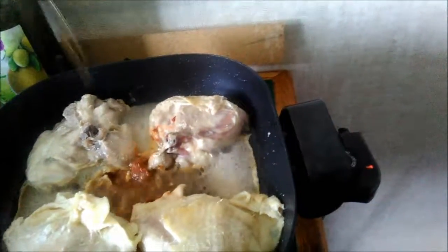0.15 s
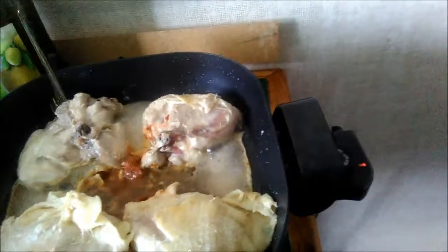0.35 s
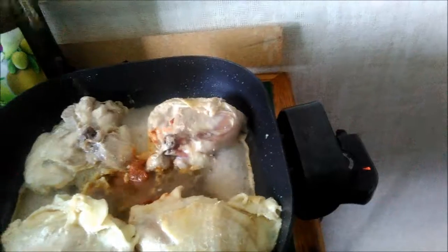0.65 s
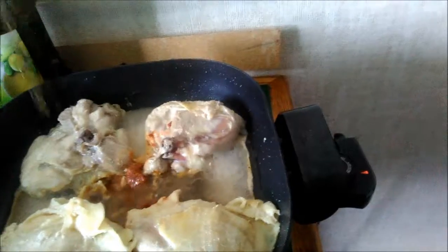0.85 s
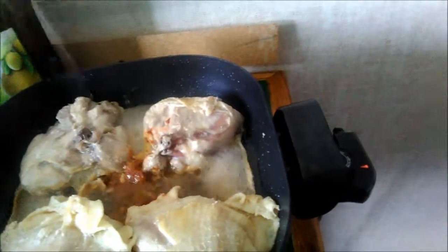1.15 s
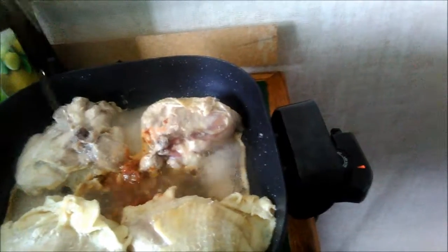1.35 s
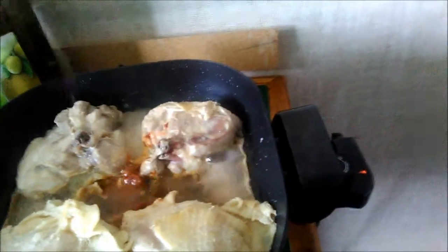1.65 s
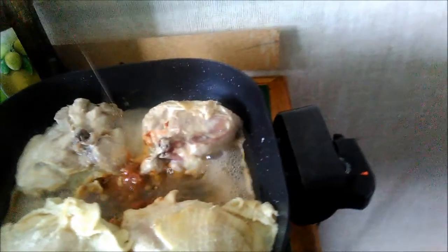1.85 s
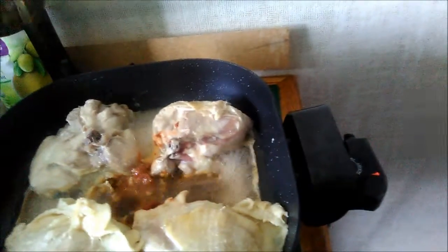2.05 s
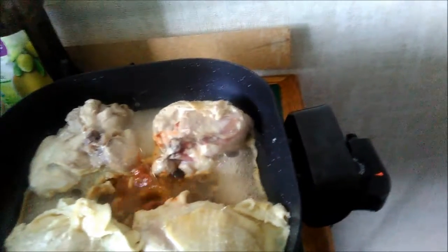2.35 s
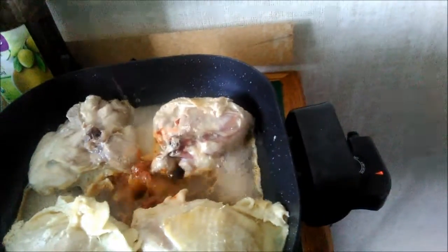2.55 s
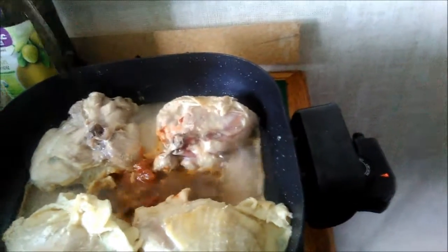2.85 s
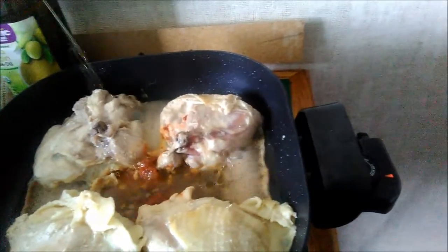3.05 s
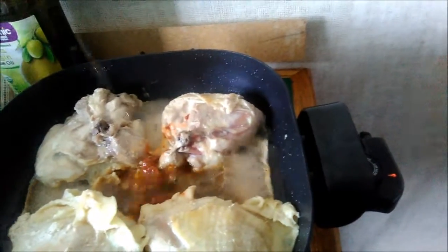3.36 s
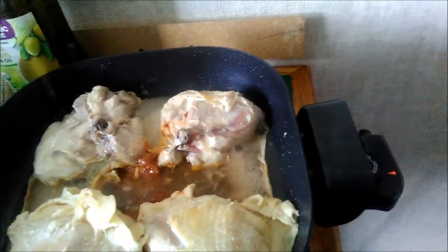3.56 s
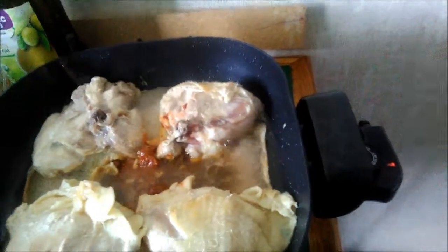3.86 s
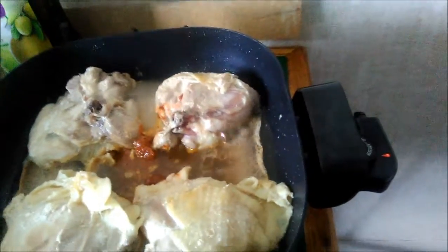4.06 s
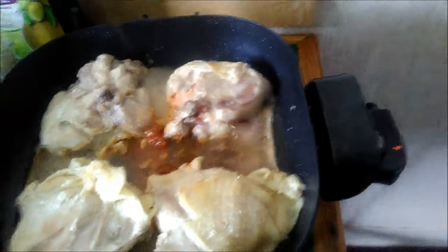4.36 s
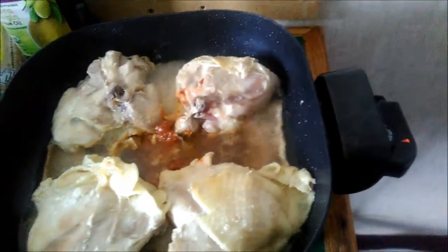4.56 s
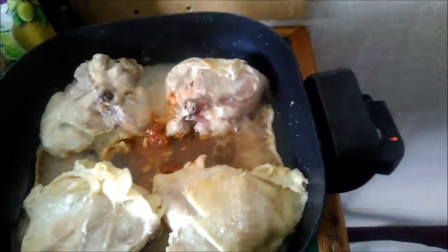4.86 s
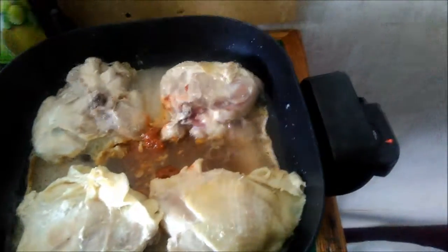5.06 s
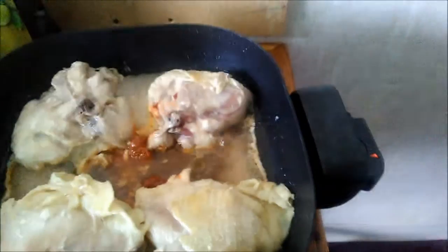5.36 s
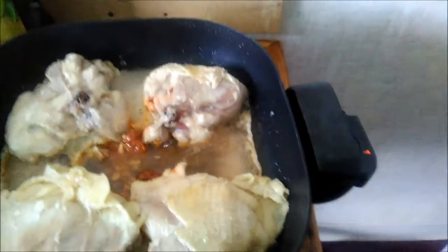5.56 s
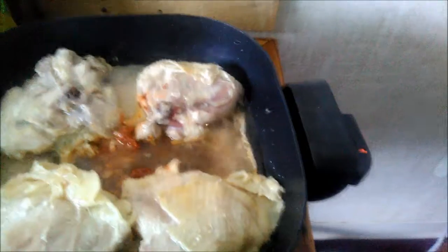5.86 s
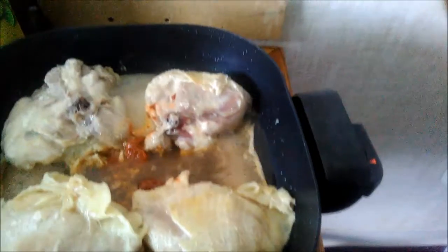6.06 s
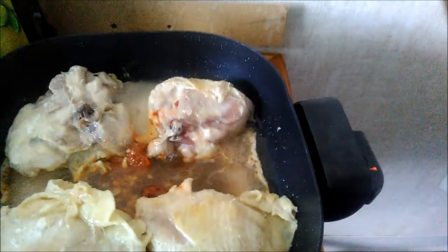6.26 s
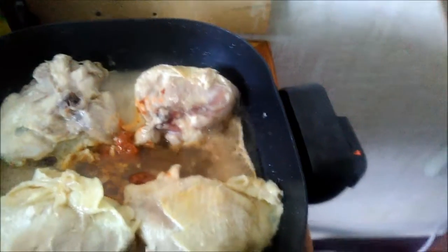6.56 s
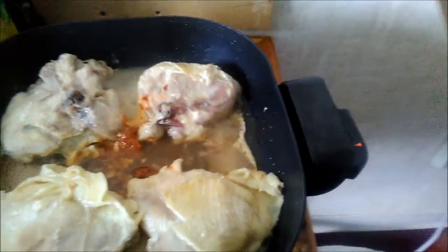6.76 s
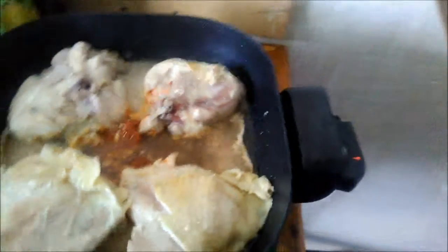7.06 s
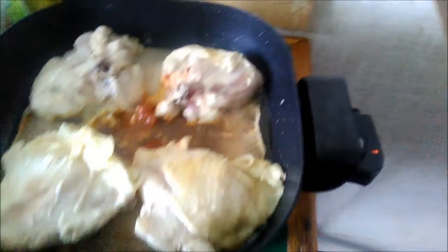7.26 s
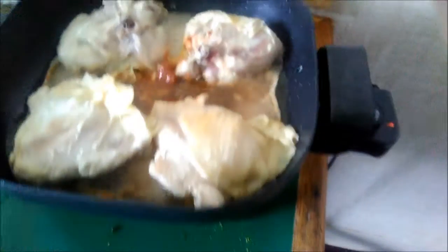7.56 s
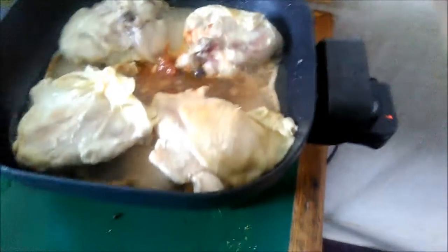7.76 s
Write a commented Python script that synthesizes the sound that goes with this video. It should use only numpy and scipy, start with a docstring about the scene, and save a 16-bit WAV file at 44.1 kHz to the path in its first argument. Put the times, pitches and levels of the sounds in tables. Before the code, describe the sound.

Close stereo pickup in a small kitchen: a thin stream of sauce sprays and sloshes into a pan of chicken in quick irregular spurts, with crisp ticking drops and small bubbly plops. The flow thins, brief squeaks appear, then a bottle lands hard on a wooden counter. A second later its cap snaps shut, followed by dull nudges and faint scraping rushes. Low rumble, a midrange drone and soft hiss continue behind.

```python
"""A thin stream of sauce trickles from a bottle into a pan, heard close by with two unlike microphones.
Shaped noise makes its spray and slosh; spurts swell, drops tick as short pings and trap small ringing bubbles.
The bottle is set down hard on a wooden counter, ringing wood and base, its cap is snapped shut (a noise crack
and a ring) and it is nudged again; late rushes scrape. Steady sines make squeaks, then a faint 800 Hz ring
around and after the nudge. The kitchen hums and hisses behind as noise."""
import sys
import numpy as np
from scipy import signal
from scipy.fft import rfft, irfft, next_fast_len
from scipy.io import wavfile
from scipy.ndimage import uniform_filter1d, map_coordinates

SR = 44100
rng = np.random.default_rng(int(sys.argv[2]) if len(sys.argv) > 2 else 0)


def pcm_store(signal):
    """Save signal as 16-bit PCM."""
    levels = np.round(np.clip(np.atleast_2d(signal), -1, 1) * 32767)
    wavfile.write(sys.argv[1], SR, levels.astype(np.int16).T)


N = 348390  # length in samples


def amp(db):
    """Turns dB into gain."""
    return 10 ** (np.asarray(db) / 20)


def unit(x):
    """Scales x to rms 1."""
    return x / np.sqrt(np.mean(x ** 2) + 1e-20)


def along(points, hz):
    """Reads a value at each frequency from (Hz, value) points joined on a log axis."""
    point_hz, values = np.transpose(points)
    return np.interp(np.log(hz + 1), np.log(point_hz + 1), values)


def curves(rows):
    """Gives one value per sample for each column after the time."""
    s, *columns = np.transpose(rows)
    return [np.interp(np.arange(N) / SR, s, column) for column in columns]


def wobble(rate):
    """A smooth random curve with rate knots a second."""
    knots = rng.standard_normal(int(N * rate / SR) + 4)
    return map_coordinates(knots, [np.arange(N) * rate / SR])


def filtered(x, response):
    """Shapes x with a response, possibly complex, for each frequency."""
    size = next_fast_len(x.shape[-1] + 8192)
    shaped = rfft(x, size) * response(np.fft.rfftfreq(size, 1 / SR))
    return irfft(shaped, size)[..., :x.shape[-1]]


def coloured(spectrum, count):
    """Noise of rms 1 with the given spectrum."""
    return unit(filtered(rng.standard_normal(count), lambda hz: amp(along(spectrum, hz))))


# How alike left and right are. Each row: frequency in Hz, likeness (1 the same, 0 unrelated).
LIKENESS = [(60, 0.86), (180, 0.85), (550, 0.85), (1650, 0.45), (4970, -0.14), (15000, 0.12)]


def spread(pair, response):
    """Two unrelated signals become left and right, alike in the bass and nearly unrelated in the treble."""
    def weights(hz):
        turn = np.arccos(np.clip(along(LIKENESS, hz), -1, 1)) / 2
        return response(hz) * [np.cos(turn), np.sin(turn)]

    mid, side = filtered(pair, weights)
    return np.array([mid + side, mid - side])


def rush(spectrum, patchy_db, lumps=0):
    """Stereo noise, its middle at rms 1, with short patches of random gain; lumps (dB per sample) add grain."""
    z = signal.stft(rng.standard_normal((2, N)), nperseg=512)[2]
    patches = uniform_filter1d(rng.standard_normal(z.shape[1:]), 14, 0)  # smooth over frequency
    patches = unit(uniform_filter1d(patches, 4, 1))  # and over time
    pair = amp(lumps) * signal.istft(z * amp(patchy_db * patches), nperseg=512)[1][:, :N]
    out = spread(pair, lambda hz: amp(along(spectrum, hz)))
    return out / np.std(out.mean(axis=0))


def ring(modes, attack):
    """A second of damped modes, each a sine that fades 60 dB in its own time; attack is in seconds."""
    t = np.arange(SR) / SR
    tones = sum(amp(db - 60 * t / t60) * np.sin(2 * np.pi * hz * t) for hz, db, t60 in modes)
    return tones * (1 - np.exp(-t / attack))


def add(track, s, sound):
    """Mixes a sound into the track from s seconds on."""
    part = track[round(s * SR):][:len(sound)]
    part += sound[:len(part)]


# The trickle beneath the spurts. Each row: time in seconds, spray level in dB, slosh level in dB.
TRICKLE = [(0.0, -67, -62), (3.41, -65.5, -64.5), (4.31, -69, -61), (5.6, -70.5, -61), (6.1, -67.5, -66),
           (7.9, -72, -65.5)]
# The clearest spurts, and late scraping rushes from 7.4 s. Each row: start in seconds, swell time in seconds,
# spray in dB, slosh in dB. The swell curve peaks about 4 dB under these levels.
SURGES = [(0.026, 0.02, -56, -81), (0.26, 0.042, -62.5, -55), (0.508, 0.032, -53.5, -62.5),
          (0.713, 0.01, -64.5, -52.5), (0.849, 0.0033, -55, -49.5), (1.029, 0.0091, -50, -57.5),
          (1.261, 0.014, -60.5, -48), (1.352, 0.0079, -59, -56), (1.657, 0.017, -50, -58.5),
          (1.788, 0.0078, -63.5, -49.5), (1.877, 0.02, -55, -50.5), (2.119, 0.016, -54, -61.5),
          (2.447, 0.013, -52, -57), (2.625, 0.022, -55, -61), (2.844, 0.018, -50.5, -51),
          (2.982, 0.0086, -51.5, -68), (3.066, 0.014, -54, -58), (3.307, 0.007, -50.5, -52),
          (3.404, 0.014, -50, -57), (3.857, 0.0057, -59, -57), (4.392, 0.028, -64, -52.5),
          (4.595, 0.043, -58, -66.5), (4.757, 0.0093, -56, -57), (4.926, 0.022, -58, -57.5),
          (5.55, 0.028, -56, -61.5), (6.168, 0.0087, -58, -55.5), (6.405, 0.02, -59, -79),
          (6.636, 0.013, -74, -51.5), (7.241, 0.014, -60.5, -62), (7.305, .012, -73, -58),
          (7.362, .004, -68.5, -57), (7.405, 0.0122, -71, -59), (7.445, .012, -67, -61.5),
          (7.56, 0.016, -59.5, -62)]
# Fainter spurts at random: how many, swell time in seconds, dB over the trickle before the swell curve, scatter in dB
SMALL_SPURTS, SMALL_SWELL_S, SMALL_DB, SMALL_SCATTER_DB = 30, 0.0033, 6.5, 3


def flow():
    """Levels of spray and slosh: the trickle plus surges that swell fast and drain slowly; powers add."""
    trickle = amp(curves(TRICKLE)) ** 2
    spray, slosh = trickle.copy()
    t = np.arange(SR // 2) / SR

    def surge(swell):
        return t / swell * np.exp(-t / swell)

    for s, swell, spray_db, slosh_db in SURGES:
        add(spray, s, amp(spray_db) ** 2 * surge(swell))
        add(slosh, s, amp(slosh_db) ** 2 * surge(swell))
    times = rng.random(SMALL_SPURTS) * N / SR
    sizes_db = SMALL_DB + SMALL_SCATTER_DB * rng.standard_normal((SMALL_SPURTS, 2))
    for s, (fine, coarse) in zip(times, amp(sizes_db) ** 2):
        add(spray, s, fine * trickle[0, int(s * SR)] * surge(SMALL_SWELL_S))
        add(slosh, s, coarse * trickle[1, int(s * SR)] * surge(SMALL_SWELL_S))
    return np.sqrt(spray), np.sqrt(slosh)


# Colour of the fine spray on the food. Each row: frequency in Hz, relative level in dB per Hz.
SPRAY = [(1500, -28.5), (2600, -7), (3400, -6), (4700, -0.5), (6300, -9), (8500, -8.5), (11000, -14.5),
         (14400, -18)]
# Colour of the slosh in the pool. Each row: frequency in Hz, relative level in dB per Hz.
SLOSH = [(470, -15), (800, -7), (1260, -5), (2380, -7), (2600, -5.5), (2960, -9.5), (3600, -24),
         (4680, -30.5), (7920, -120)]


def stream(spray, slosh):
    """The sauce sprays on the food and sloshes in the pool: two grainy noises that follow the flow."""
    fine = rush(SPRAY, patchy_db=2.0, lumps=2.96 * wobble(450) + 1.6 * wobble(40))
    coarse = rush(SLOSH, patchy_db=2.5, lumps=1.9 * wobble(120) + 1.4 * wobble(30))
    return spray * fine + slosh * coarse


# The background over time. Each row: time in seconds, rumble level in dB, drone level in dB.
KITCHEN = [(0.0, -52.5, -59), (1.89, -53.5, -62), (5.6, -51, -60), (6.3, -49.5, -60), (6.86, -55, -59),
           (7.4, -53.5, -63.5), (7.62, -54, -73), (7.9, -56, -68)]
# Colours of the three background noises. Each row: frequency in Hz, relative level in dB per Hz.
RUMBLE = [(12, -26.5), (22, -2.5), (40, -10.5), (58, -4.5), (75, 1.5), (88, -8), (100, -19.5), (120, -2.5),
          (145, -9), (175, -14.5), (222, -11), (280, -15.5), (400, -21.5), (500, -35.5), (800, -93)]
DRONE = [(210, -14.5), (350, -15), (413, -2.5), (568, -2.5), (774, 4), (918, -5.5), (1130, -12.5),
         (1200, -20.5), (1560, -36), (2640, -120)]
HISS = [(530, -62), (900, -3.5), (1120, -6.5), (1250, -3.5), (1780, 1), (2100, -26.5), (2300, -1),
        (3040, -30.5), (4360, -28.5), (5830, -5), (8450, -8.5), (12500, -14.5), (14400, -17.5)]


def kitchen():
    """A throbbing rumble, a drone near 750 Hz and a smooth hiss, each made of shaped noise."""
    rumble_db, drone_db = curves(KITCHEN)
    rumble = amp(rumble_db + 0.47 * wobble(5.156)) * rush(RUMBLE, patchy_db=2.6)
    drone = amp(drone_db + 1.9 * wobble(17) + 1.5 * wobble(4)) * rush(DRONE, patchy_db=2.5)
    hiss = amp(-69.5) * rush(HISS, patchy_db=1.9)
    return rumble + drone + hiss


TICK_CYCLES = 57  # cycles until the ping is 60 dB down
PUFF_S, PUFF_WIDTH = 0.011, 0.58  # seconds until 60 dB down; bandwidth of each filter pass over pitch


def tick(db, hz):
    """A drop bursts on the food: a few cycles at its pitch inside a short, wide puff of noise."""
    t = np.arange(SR // 50) / SR
    ping = amp(-60 * t * hz / TICK_CYCLES) * np.sin(2 * np.pi * hz * t) * (1 - np.exp(-t * hz / 1.3))
    puff = amp(1.5 - 60 * t / PUFF_S) * (1 - np.exp(-t / .0003)) * rng.standard_normal(len(t))
    b, a = signal.iirpeak(min(hz, 15000), 1 / PUFF_WIDTH, SR)
    for _ in range(2):
        puff = signal.lfilter(b, a, puff)
    return amp(db) * (ping + puff)


BUBBLE_CYCLES = 33.5  # cycles at the starting pitch until 60 dB down


def bubble(db, hz):
    """A slap on the surface, then a tone whose pitch creeps up as the bubble nears the surface."""
    t = np.arange(SR // 10) / SR
    life = t * hz / BUBBLE_CYCLES
    slap = amp(-8 - 60 * t / .004) * uniform_filter1d(rng.standard_normal(len(t)), size=4)
    tone = amp(-60 * life) * np.sin(2 * np.pi * hz * t * (1 + 0.034 * life))
    return amp(db) * (slap + tone * (1 - np.exp(-t * hz / 0.7)))


# Clear drops bursting on the food. Each row: start in seconds, level in dB, centre pitch in Hz.
TICKS = [(0.0548, -33, 5140), (0.256, -39, 9900), (.281, -43, 5040), (0.5793, -38, 4500),
         (0.6245, -51, 9250), (0.8544, -42.5, 4930), (1.014, -50.5, 9160), (2.7144, -41.5, 9600),
         (2.822, -41.5, 4760), (2.905, -49.5, 9480), (2.989, -42, 5700), (3.069, -45, 4340),
         (4.7899, -35, 4270), (6.421, -36.5, 4600), (0.307, -35, 5200), (0.8399, -38.5, 5000),
         (1.038, -34, 4800), (1.361, -32, 9100), (1.293, -47, 6470), (1.372, -32, 4750), (1.373, -26, 3880),
         (1.457, -45.5, 7900), (1.662, -26, 3630), (1.661, -44, 6780), (1.9955, -40, 7500),
         (2.154, -36, 4780), (2.193, -36, 4980), (2.93, -39, 3100), (2.9332, -27.5, 5850),
         (3.0098, -36.5, 11200), (3.13, -37, 5070), (3.313, -25, 4450), (3.312, -32.5, 7700),
         (3.3952, -32, 8360), (3.428, -33, 7000), (3.558, -35.5, 6570), (3.5666, -36, 11700),
         (3.642, -37, 6750), (4.93, -41.5, 4640), (5.207, -38.5, 6300), (5.597, -36.5, 4670),
         (5.624, -35.5, 4800), (6.091, -38.5, 4800), (6.344, -34.5, 4227), (6.479, -33, 3150)]
# Clear drops trapping air in the pool. Each row: start in seconds, level in dB, starting pitch in Hz.
BUBBLES = [(0.269, -39.5, 1380), (.401, -40.5, 800), (1.293, -36, 1520), (1.916, -31, 1598),
           (2.857, -32.5, 2630), (3.08, -32.5, 2630), (3.312, -34.5, 1613), (4.34, -35, 2260),
           (4.541, -32.5, 2900), (4.563, -38, 774), (4.79, -41, 1920), (5.027, -36.5, 2350),
           (5.04, -40.5, 1650), (5.284, -36, 2210), (6.238, -39, 795), (6.578, -34, 2450),
           (7.319, -39, 1310), (7.366, -44.5, 1795), (6.659, -41, 1930), (7.252, -46, 1250),
           (7.261, -46.5, 1320), (7.648, -47, 1380), (7.668, -50.5, 1250), (7.873, -49.5, 850),
           (7.789, -44.5, 1354), (7.81, -45, 1300), (7.836, -43.5, 1254)]
FAINT_TICKS, FAINT_BUBBLES = 450, 160  # how many
# Faint ticks: weakest in dB over the spray, span in dB, lowest pitch in Hz, highest pitch over lowest
TICK_DB, TICK_SPAN_DB, TICK_LOW_HZ, TICK_RANGE = 4, 9.5, 2160, 4.5
# Faint bubbles: the same four settings, over the slosh
PLOP_DB, PLOP_SPAN_DB, PLOP_LOW_HZ, PLOP_RANGE = 8, 6, 753, 4


def drops(spray, slosh):
    """Clear ticks and bubbles, and fainter ones that grow with the flow; faint ticks crowd into the surges."""
    track = np.zeros(N)
    for s, db, hz in TICKS:
        add(track, s, tick(db, hz))
    for s, db, hz in BUBBLES:
        add(track, s, bubble(db, hz))
    share = np.cumsum(spray) / spray.sum()  # more spray, more ticks
    for w, u, v in rng.random((FAINT_TICKS, 3)):
        s = np.searchsorted(share[:-1], w) / SR
        sound = tick(TICK_DB + TICK_SPAN_DB * v * v, TICK_LOW_HZ * TICK_RANGE ** u)
        add(track, s, spray[int(s * SR)] * sound)
    for s, u, v in rng.random((FAINT_BUBBLES, 3)) * [N / SR, 1, 1]:
        sound = bubble(PLOP_DB + PLOP_SPAN_DB * v * v, PLOP_LOW_HZ * PLOP_RANGE ** u)
        add(track, s, slosh[int(s * SR)] * sound)
    return track


# Short steady tones: squeaks, then the faint 800 Hz ring around and after the nudge at 7.13 s.
# Each row: start in seconds, length in seconds, level in dB, pitch in Hz.
STEADY_TONES = [(4.623, 0.029, -35.5, 2537), (4.688, 0.016, -48.5, 5160), (4.695, 0.011, -36, 3960),
                (4.754, 0.015, -50, 5140), (7.125, 0.072, -56, 798), (7.34, 0.06, -56, 800)]


def steady_tones():
    """Squeaks and a faint later ring, all short sines of steady pitch that swell and fade."""
    track = np.zeros(N)
    for s, length, db, hz in STEADY_TONES:
        t = np.arange(int(length * SR)) / SR
        add(track, s, amp(db) * np.sqrt(np.sin(np.pi * t / length)) * np.sin(2 * np.pi * hz * t))
    return track


# Ringing modes of the wooden counter. Each row: pitch in Hz, level in dB, seconds to fade 60 dB if left alone.
COUNTER = [(156.7, 4, 0.36), (224.6, -17, 0.58), (274, -1.5, 0.34), (297, -25, 1.4), (354.2, -10, 0.33),
           (410.4, -5.5, 0.17), (544, -3, 0.3), (565, -2, 0.45), (727, -5.5, 0.22), (797, -6.5, .2),
           (837, -13, 0.12), (1074, -20.5, 0.12), (1485, -25, .14), (1976, -29.5, .12)]
# Colour of its crowd of lesser modes. Each row: frequency in Hz, relative level in dB per Hz.
THUD = [(80, -42), (150, -3), (600, -1.5), (900, -10), (1200, -15), (2200, -22), (3000, -22), (6000, -38.5),
        (12000, -50.5)]
# Blows of the bottle on the counter. Each row: start in seconds, level in dB, hardness in Hz (lower is duller),
# seconds to fade 60 dB from the hand that steadies the bottle, on top of the wood's own fading.
BLOWS = [(5.7125, -13, 9050, 4.5), (5.729, -22, 910, 3.8), (6.96, -47.5, 700, 0.27),
         (7.006, -39.5, 650, 0.19), (7.03, -45, 646, .2), (7.055, -45.5, 650, 0.29),
         (7.128, -50.5, 500, 0.23), (7.205, -54, 300, 0.17)]
SCATTER_DB, FLOOR_HZ = 1, 125  # change of each mode from blow to blow; the counter radiates little below this


def bottle():
    """Blows of the bottle ring the counter's modes over a noisy thud, duller when soft."""
    track, t = np.zeros(N), np.arange(SR) / SR
    for s, db, hard_hz, held in BLOWS:
        modes = [(hz, level + SCATTER_DB * rng.standard_normal(), t60) for hz, level, t60 in COUNTER]
        wood = ring(modes, attack=0.0017)
        thud = amp(2.0 - 60 * t / 0.16) * (1 - np.exp(-t / 0.002)) * coloured(THUD, len(t))
        # a gentle low-pass: a soft blow excites little treble
        blow = filtered(wood + thud, lambda f: 1 / (1 + (1.4j * f - f * f / hard_hz) / hard_hz))
        add(track, s, amp(db - 60 * t / held) * blow)
    return filtered(track, lambda f: -f * f / (FLOOR_HZ ** 2 - f * f + 1.4j * f * FLOOR_HZ))


# Modes of the bottle's base while it rocks. Each row: pitch in Hz, level in dB, seconds to fade 60 dB.
BASE = [(545, -13, 0.31), (734, -9.5, 0.29), (819, -16, 0.2), (1850, -21, 0.12)]
# Mode of the base's far rim. Each row: pitch in Hz, level in dB, seconds to fade 60 dB.
RIM = [(2180, -15.5, 0.27)]
LANDING, TIPPING, SEATED = 5.7125, 5.7225, 5.732  # seconds: first touch, tip onto the far rim, sits flat


def base():
    """The bottle's base and rim ring until it sits flat, which quickly stops them."""
    track, t = np.zeros(N), np.arange(SR) / SR
    for s, modes, attack in ((LANDING, BASE, .0013), (TIPPING, RIM, .002)):
        rocking = 1 / (1 + np.exp(np.clip((t - SEATED + s) / .0012, -50, 50)))
        add(track, s, rocking * ring(modes, attack))
    return track


# Ringing modes of cap and bottle. Each row: pitch in Hz, level in dB, seconds to fade 60 dB.
CAP = [(269.5, -33, 0.14), (430, -30, 0.2), (577, -20.5, 0.12), (701, -27, 0.11), (823, -29, 0.14),
       (3380, -19, 0.071), (3960, -29.5, 0.07), (4820, -30, 0.036), (6050, -22, .03), (7200, -18, 0.023)]
# Colour of the crack. Each row: frequency in Hz, relative level in dB per Hz.
CRACK = [(300, -7.5), (700, 1.5), (1350, -11), (2200, -1.5), (4200, 0), (7500, -5), (14400, -14.5)]
SNAP, CRACK_S = 6.7025, .012  # start in seconds; seconds for the crack to fade 60 dB


def cap():
    """A noise crack with a rough tail, and the plastic's short ring, which carries less into the room."""
    track, room, t = np.zeros(N), np.zeros(N), np.arange(SR) / SR
    burst = amp(-8.0 - 60 * t / CRACK_S)
    rough_tail = amp(-30 - 60 * t / 0.1 + 3.5 * wobble(150)[:SR])
    crack = (burst + rough_tail) * (1 - np.exp(-t / 0.00093)) * coloured(CRACK, len(t))
    body = amp(1.5 * wobble(120)[:SR]) * ring(CAP, attack=0.0013)
    add(track, SNAP, body + crack)
    add(room, SNAP, amp(-28) * body + amp(-13) * crack)
    return track, room


# How the room's echo dies. Each row: frequency in Hz, seconds to fade 60 dB.
WALLS = [(200, 0.71), (1000, 0.5), (4000, 0.4), (12000, 0.3)]


def walls(x):
    """The room's answer: fading noise in which each frequency dies at its own speed."""
    hz, t, z = signal.stft(rng.standard_normal((2, SR // 2)), SR, nperseg=256)
    fade = amp(-60 * t / along(WALLS, hz)[:, None])
    tail = signal.istft(z * fade, SR, nperseg=256)[1]
    late = np.pad(x, (200, 0))[None]  # the echo starts 200 samples late
    wet = signal.fftconvolve(late, tail / np.linalg.norm(tail[0]), axes=1)[:, :N]
    return spread(wet, np.ones_like)


def placed(x, lag):
    """A near source reaches the left microphone lag seconds after the right, or before it if negative."""
    return filtered(x, lambda hz: np.exp(-1j * np.pi * lag * hz * [[1], [-1]]))


def scene():
    """Near sources, their echoes and the background; the small base carries less into the room than the counter."""
    spray, slosh = flow()
    wet = drops(spray, slosh) + steady_tones()
    wood, foot = bottle(), base()
    snap, snap_far = cap()
    near = placed(wet, lag=0.00014) + placed(wood + foot, lag=-.00016) + placed(snap, lag=-.00027)
    # the small drops barely reach the walls
    far = walls(amp(-26) * wet + amp(-14.5) * wood + amp(-29.0) * foot + snap_far)
    return near + far + stream(spray, slosh) + kitchen()


# Colour of the left microphone over the right. Each row: frequency in Hz, difference in dB.
PORTS = [(60, -4.5), (99, 0.5), (160, -1), (270, 0.5), (450, -1.5), (740, -1), (1220, -2), (2010, -6),
         (3330, 4), (5500, 6.5), (7300, -8.5), (9080, -16), (15000, -8.5)]
TOP_HZ = 14400  # band limit


def record(dry):
    """The two microphones differ in colour; the loudest peaks are rounded off; nothing passes above the band limit."""
    x = filtered(dry, lambda hz: amp(along(PORTS, hz) * [[.5], [-.5]]))  # half the difference each
    x = x / (1 + np.abs(x / .95) ** 6) ** (1 / 6)
    return filtered(x, lambda hz: hz < TOP_HZ)


dry = scene()
out = record(dry)
pcm_store(out)
```